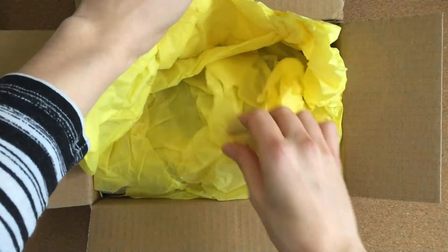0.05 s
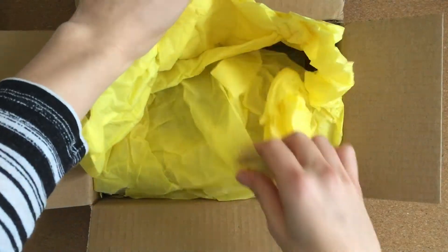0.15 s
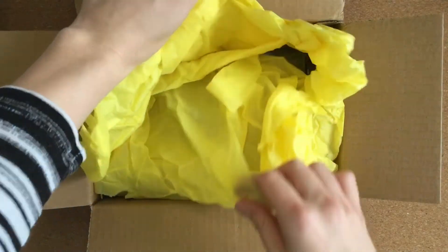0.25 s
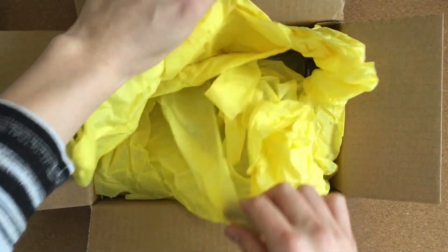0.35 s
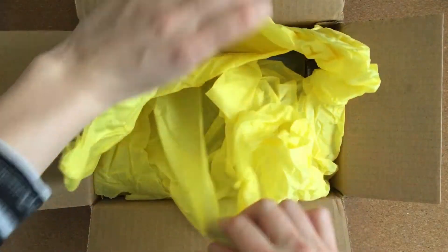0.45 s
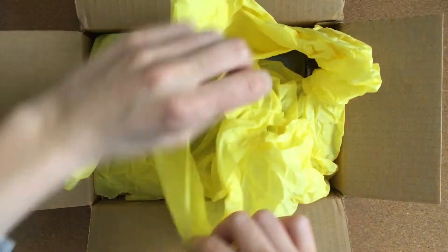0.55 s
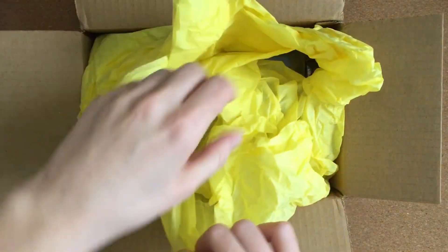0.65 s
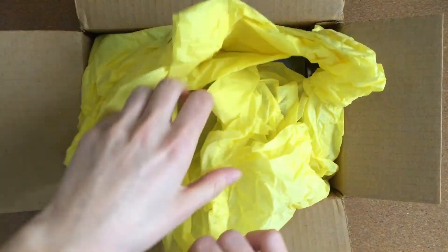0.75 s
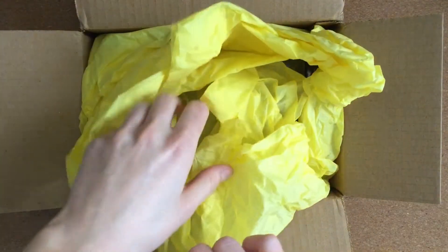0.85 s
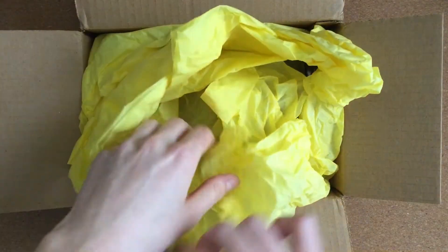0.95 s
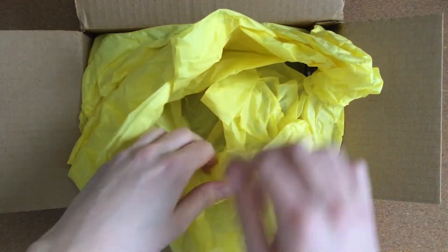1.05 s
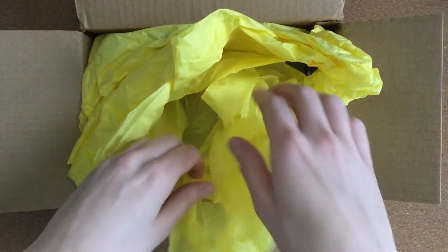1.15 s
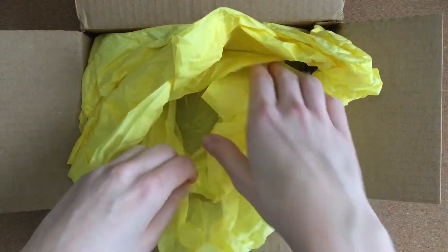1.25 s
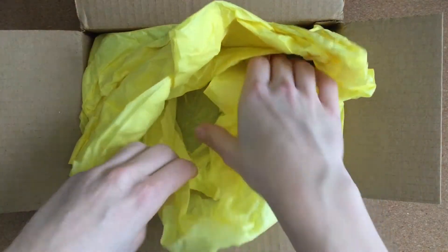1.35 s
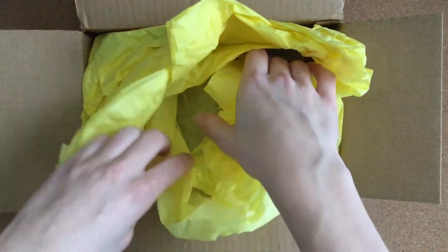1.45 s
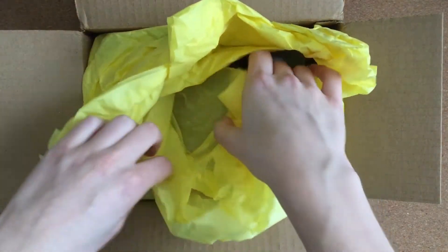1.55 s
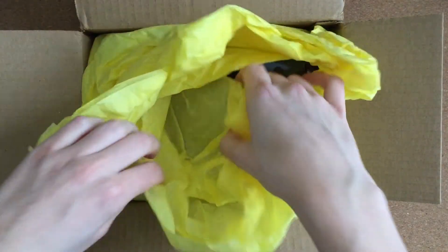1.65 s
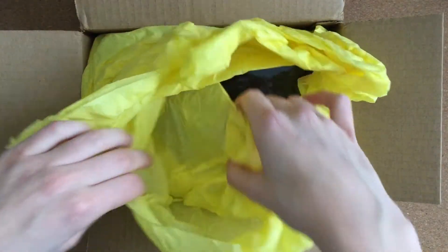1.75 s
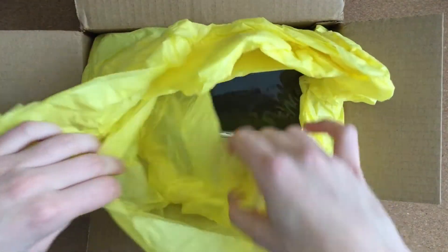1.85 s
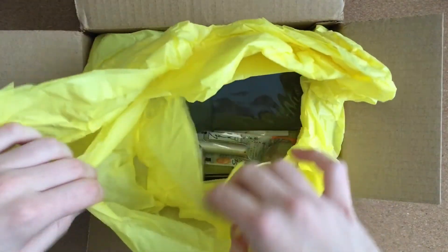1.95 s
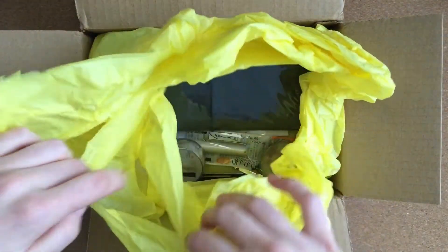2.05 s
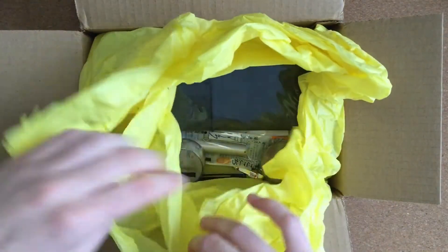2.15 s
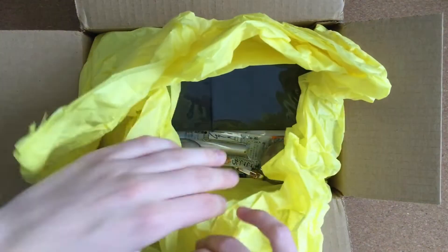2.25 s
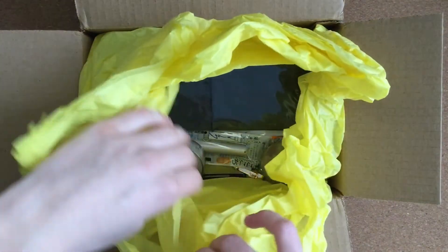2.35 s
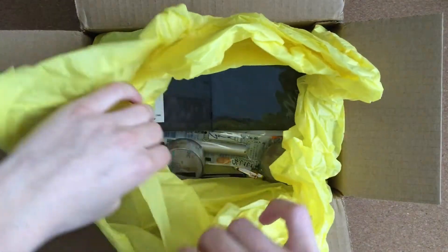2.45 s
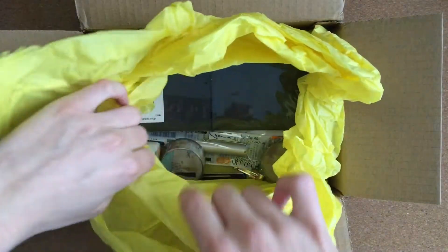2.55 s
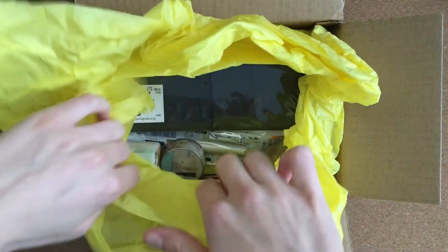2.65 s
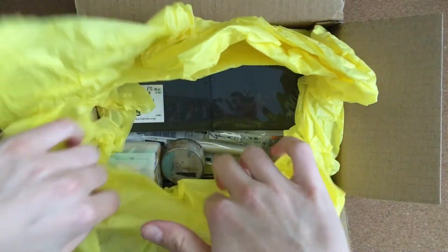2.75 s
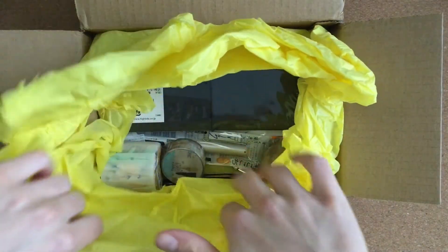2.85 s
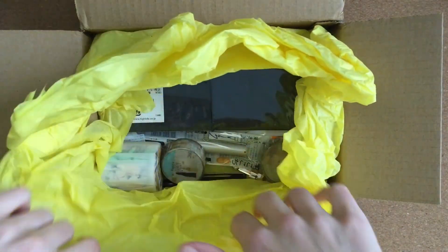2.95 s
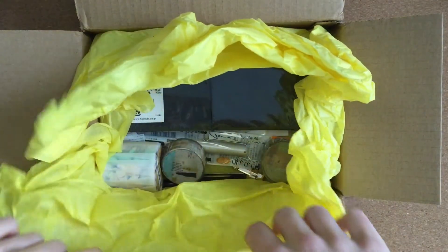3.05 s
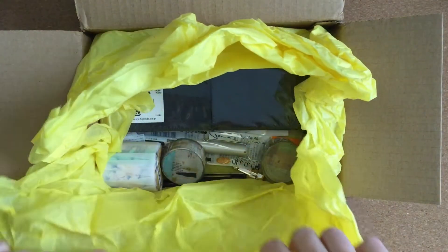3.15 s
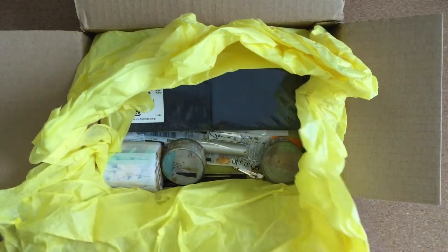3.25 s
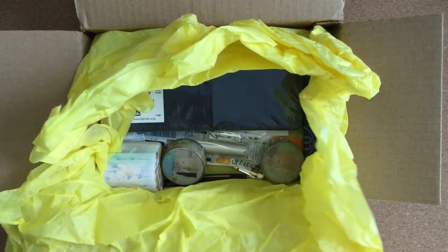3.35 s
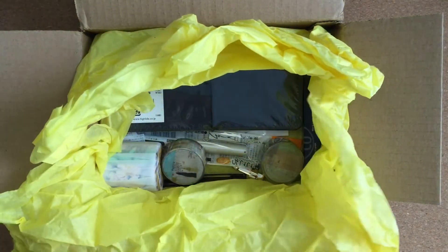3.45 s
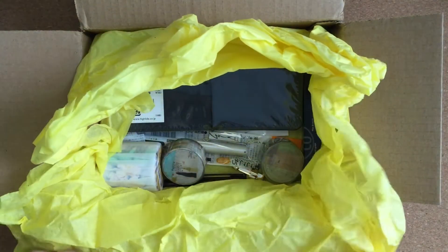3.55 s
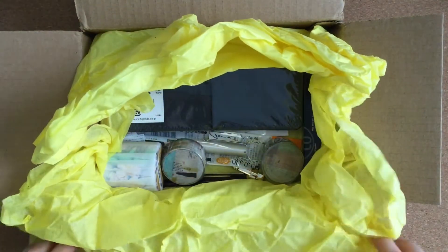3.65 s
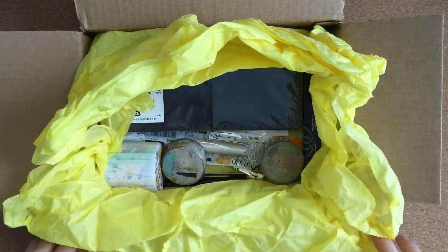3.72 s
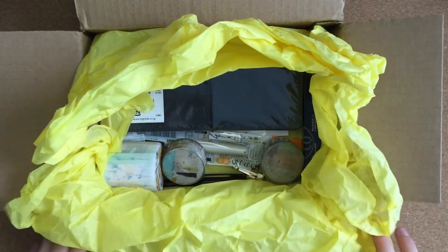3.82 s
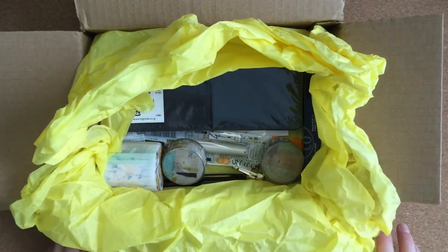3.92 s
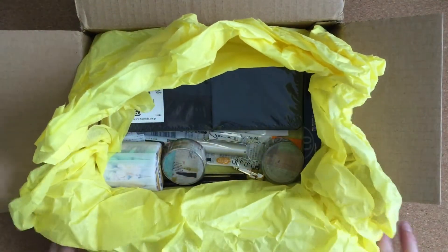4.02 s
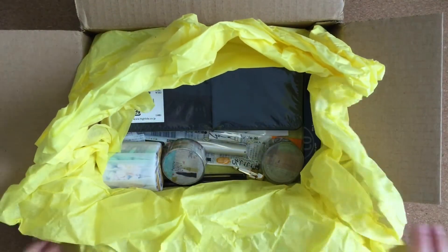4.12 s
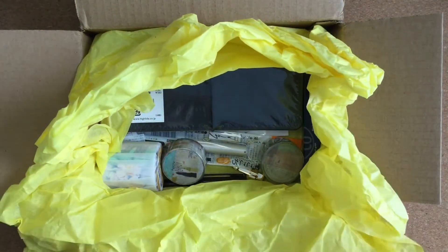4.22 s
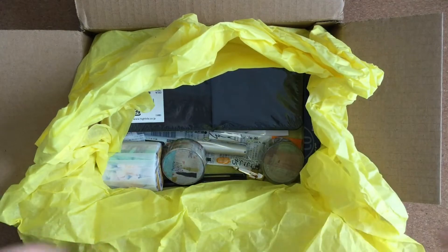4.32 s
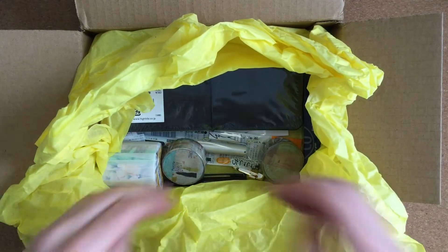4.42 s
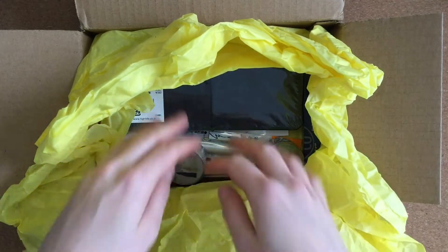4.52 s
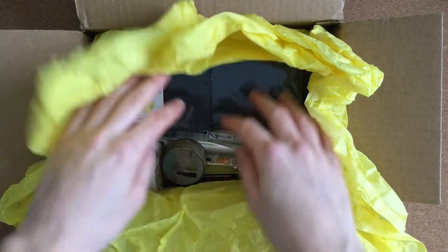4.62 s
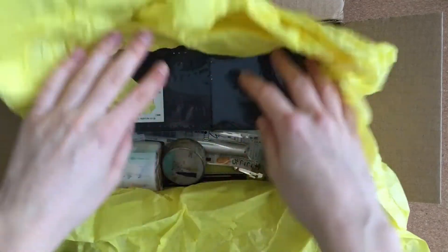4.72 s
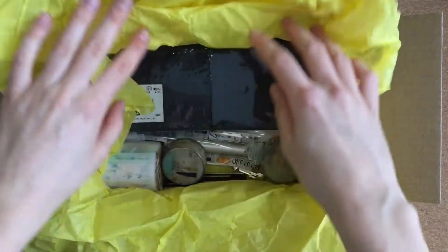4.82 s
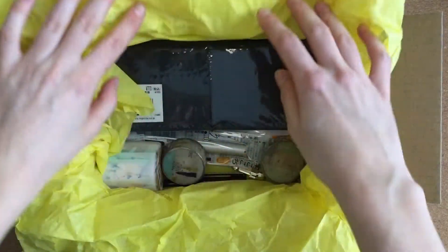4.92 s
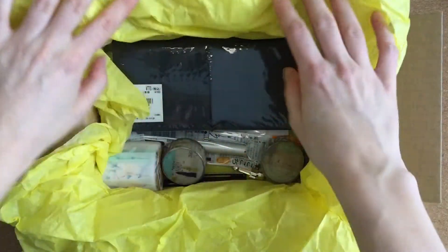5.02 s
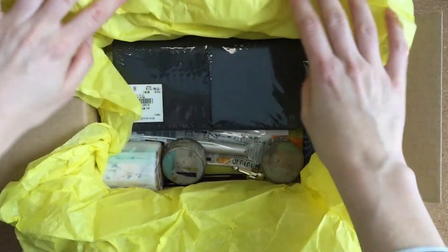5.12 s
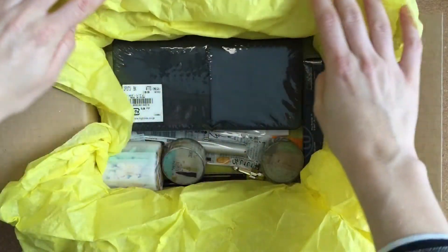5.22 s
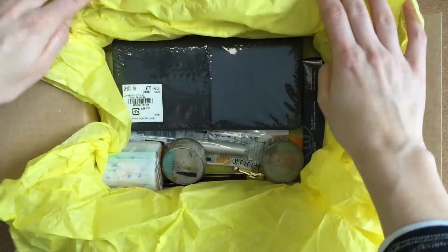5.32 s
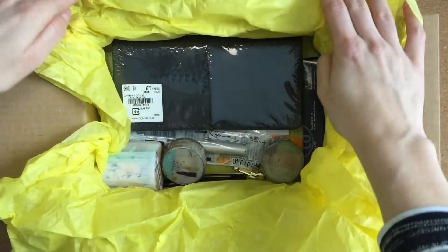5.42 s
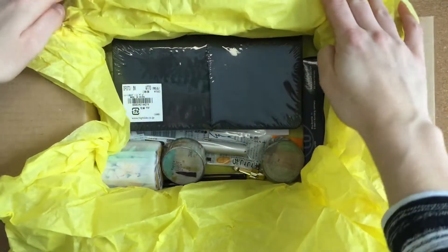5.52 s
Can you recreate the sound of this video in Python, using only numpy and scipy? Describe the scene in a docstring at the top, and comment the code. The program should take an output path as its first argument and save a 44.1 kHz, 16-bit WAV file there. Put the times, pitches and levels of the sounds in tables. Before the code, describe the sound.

Hands unfold crumpled tissue paper inside a cardboard box, making dense, crisp crinkling over a papery hiss, stroke after stroke, with a few sharper snaps. Midway, the paper is smoothed over a flap with a faint hollow rub and light finger taps. It settles briefly into small ticks, then rustles again as it is pushed back. The sound is close, in a quiet room.

```python
"""Unfolding tissue paper

Two hands unfold crumpled tissue paper in a cardboard box on a desk, in a quiet room. Creases buckle in
dense avalanches over the friction hiss of sheet on sheet, with a few louder snaps. The sheet flutters,
fingers tap the front flap and hands bump the box. Smoothing the paper over the flap excites a hollow
resonance; the paper settles with single ticks, then is pushed back."""
import sys
import numpy as np
from scipy import signal
from scipy.fft import rfft, irfft, next_fast_len
from scipy.io import wavfile
from scipy.ndimage import uniform_filter1d

SR = 44100
rng = np.random.default_rng(int(sys.argv[2]) if len(sys.argv) > 2 else 0)


def materialize(psi):
    """Save the field psi as 16-bit PCM at rate SR to the path in sys.argv[1].

    A 1-D psi becomes a single channel; in a 2-D psi each row is a channel.
    """
    bounded = np.clip(np.atleast_2d(psi).T, -1, 1)
    quanta = np.round(bounded * 32767).astype(np.int16)
    wavfile.write(sys.argv[1], SR, quanta)


N = 245825
TIME = np.arange(N) / SR
HZ = np.fft.rfftfreq(8192, 1 / SR)
RUB_START_S, RUB_RISE_S, RUB_HOLD_S, RUB_RELEASE_S = 2.94, 0.7, 0.22, 0.56  # paper drawn over the flap


def amp(db):
    """Amplitude ratio of a level in decibels."""
    return 10 ** (np.asarray(db) / 20)


def unit(x):
    """Normalisation to rms 1."""
    return x / np.sqrt(np.mean(x ** 2) + 1e-20)


def colour(points):
    """Magnitude response through (f/Hz, level/dB) points, interpolated in log frequency."""
    hz, db = np.transpose(points)
    return amp(np.interp(np.log(HZ + 1), np.log(hz), db))


def shaped(x, gain):
    """Minimum-phase filtering: the response is causal, so attacks stay sharp."""
    cepstrum = irfft(np.log(np.maximum(gain, 1e-5)))
    half = len(cepstrum) // 2
    cepstrum[1:half] *= 2
    cepstrum[half:] = 0
    response = irfft(np.exp(rfft(cepstrum)))
    return signal.oaconvolve(x, response)[:N]


def wander(hz, size=2048):
    """Random modulation: noise of rms 1 that rolls off above about hz."""
    f = np.fft.rfftfreq(size, TIME[-1] / size)
    drift = irfft(rfft(rng.standard_normal(size)) * f / (f + 6) / (1 + (f / hz) ** 2))
    return unit(np.interp(TIME, np.linspace(0, TIME[-1], size), drift))


def swell(start_s, rise_s, hold_s, release_s):
    """Trapezoidal envelope, 0-1: a movement gathers speed, holds it and slows to a stop."""
    since = TIME - start_s
    return np.clip(np.minimum(since / rise_s, 1 - (since - rise_s - hold_s) / release_s), 0, 1)


def room_air():
    """Ambient noise: the still room has a steady spectrum, strongest in the bass."""
    # spectrum of still air: f/Hz, relative level/dB
    spectrum = [(18, -21), (35, 5), (116, 2.5), (240, -13), (472, -4), (2300, -43), (5000, -60),
                (15000, -25)]
    return amp(-83.5) * unit(shaped(rng.standard_normal(N), colour(spectrum)))


def handling():
    """Incoherent addition: hand strokes sum in power and set the timbre by their share of it."""
    # strokes: start t/s, rise/s, hold/s, release/s, crease level/dB,
    # relative fold level/dB, relative crinkle level/dB, facet f/Hz, tautness (0-1)
    strokes = [(-0.25, 0.43, .22, .12, -47.5, -12.5, -1.5, 1790, 0.24),
               (0.372, 0.085, 0.06, 0.1, -50, -13, -3, 1680, 0.17),
               (0.518, 0.047, 0.069, 0.19, -49.5, -12.5, -3.5, 1850, 0.34),
               (0.718, 0.1, .02, 0.14, -52, -10.5, -2, 1920, 0.17),
               (0.854, 0.065, .08, 0.21, -56.5, -14, 3, 2100, 0.1),
               (1.071, 0.036, .02, 0.13, -57.5, -10.5, -0.5, 2150, 0),
               (1.173, 0.028, 0.018, 0.19, -57, -12.5, 2, 2010, .05),
               (1.313, 0.037, 0.24, 0.18, -54, -14, -2, 1180, 0.25),
               (1.491, .24, 0.025, .09, -48, -13, -2.5, 1900, 0.03),
               (1.755, 0.067, 0.22, 0.057, -47.5, -11.5, -.8, 1930, .14),
               (2.01, 0.12, 0.0057, 0.099, -49.5, -10, -2, 1770, 0),
               (2.152, 0.053, 0.072, 0.16, -56, -13, -2, 3900, 0),
               (2.321, 0.17, 0.12, 0.062, -51, -14, -0.5, 1890, 0.1),
               (2.584, 0.087, 0.23, 0.28, -48.5, -16, -1.5, 3950, 0.19),
               (2.993, 0.088, .17, 0.15, -54, -11, 1.5, 3396, .08),
               (3.28, 0.036, 0.2, 0.17, -51, -11.5, 1, 3300, 0),
               (3.532, 0.076, 0.1, 0.037, -51, -11.5, 3, 1290, .03),
               (3.67, 0.089, 0.21, 0.086, -50, -12.5, 0, 1280, 0.08),
               (3.993, 0.064, 0.12, 0.11, -56, -15.5, 0, 2400, .05),
               (4.143, 0.068, 0.069, 0.12, -61, -17.5, -.5, 2400, .1),
               (4.599, 0.04, 0.015, .07, -59, -9, -2, 1700, .03),
               (4.66, 0.082, 0.058, 0.11, -50, -11, 0.5, 1540, 0),
               (4.829, 0.081, 0.0063, 0.14, -51, -9, 1.5, 2300, 0),
               (4.944, 0.085, 0.057, 0.16, -51.5, -12.5, -0.5, 2500, 0.03),
               (5.093, 0.15, 0.063, 0.11, -49, -11.5, 0, 2520, .28),
               (5.328, 0.044, 0.16, 0.2, -52.5, -7.5, 0, 2230, 0)]
    power = np.array([(amp(db) * swell(start, rise, hold, release)) ** 2
                      for start, rise, hold, release, db, *_ in strokes])
    power += amp(-87) ** 2 / len(strokes)  # left alone, the creases still creep faintly
    total = power.sum(0)
    timbre = np.array(strokes)[:, 5:].T @ power / total
    return 10 * np.log10(total), *timbre


def buckle_sizes(per_s, spread_db):
    """Poisson process: most buckles are small, a few large; mean power is independent of the rate."""
    sizes = amp(spread_db * np.minimum(rng.exponential(1, N), 3.3)) * np.sign(rng.random(N) - .5)
    occurs = rng.random(N) < per_s / SR
    return sizes * occurs / np.sqrt(per_s)


def cracks(per_s, spread_db, decay_s):
    """Impulsive excitation: each buckle releases a burst of fibre noise that decays exponentially."""
    power = signal.lfilter([1], [1, -np.exp(-2 / (decay_s * SR))], buckle_sizes(per_s, spread_db) ** 2)
    return unit(np.sqrt(power) * rng.standard_normal(N))


def crackle(per_s, spread_db, cycles, size=640):
    """Damped free vibration: stiff facets ring for a few cycles, each at its natural frequency."""
    sizes = buckle_sizes(per_s, spread_db)
    onsets = np.flatnonzero(sizes)[:, None]
    hz = 900 * (14000 / 900) ** rng.random(N)[onsets]
    t = TIME[:size]
    strength = sizes[onsets] * hz  # higher rings are stronger, so the crackle is evenly bright
    rings = strength * np.sin(2 * np.pi * hz * t) * np.exp(-t * hz / cycles)
    samples = onsets + np.arange(size)
    return unit(np.bincount(samples.ravel(), rings.ravel(), N)[:N])


def box_echoes(x, spots=8, walls_t60_s=0.15, room_t60_s=0.18):
    """Reflection: each spot on the sheet has its own quick wall echoes and faint room tail."""
    t = TIME[:SR // 4]
    spot = rng.integers(0, spots, N // 128 + 1).repeat(128)[:N]
    out = x.copy()
    for k in range(spots):
        walls = rng.standard_normal(len(t)) * amp(-60 * t / walls_t60_s) * (t > .001)
        tail = rng.standard_normal(len(t)) * amp(-60 * t / room_t60_s) * (t > .005)
        response = amp(-5.5) * walls / np.linalg.norm(walls) + amp(-17.5) * tail / np.linalg.norm(tail)
        share = uniform_filter1d(1. * (spot == k), size=32)
        out += signal.oaconvolve(x * share, response)[:N]
    return out


def resonate(x, hz, width_hz):
    """Resonance: a single mode of unit gain whose centre frequency may glide."""
    turn = np.exp(2j * np.pi * np.cumsum(hz * np.ones(len(x))) / SR)
    pole = np.exp(-np.pi * width_hz / SR)
    return 2 * (turn * signal.lfilter([1 - pole], [1, -pole], x / turn)).real


def rustle(level_db, folds_db, fine_db, facet_hz, tautness):
    """Buckling avalanches over friction hiss: faster handling flips more creases, in clumps."""
    # tone colour of the rustle as heard on the desk: f/Hz, relative level/dB
    tone = [(60, -34), (150, -25.5), (250, -8.5), (330, -7.5), (420, -6.5), (560, -7), (670, -2), (900, -4),
            (1150, -3.5), (1700, -4), (2700, -4), (3900, -4.5), (5800, -5), (9000, -6.5), (13000, -9.5),
            (15500, -11)]
    # notches of the microphone port: f/Hz, width/Hz, level/dB
    notches = [(4900, 170, -6), (7630, 770, -3), (10390, 620, -6)]
    activity = np.clip(amp(.8 * (level_db + 50)), 0.11, 2)  # buckling rate relative to a usual stroke
    soft = cracks(2100 * activity, spread_db=3.0, decay_s=0.0015)
    stiff = crackle(1900 * activity, spread_db=0.5, cycles=5.7)
    taut = crackle(380 * activity, spread_db=1.0, cycles=9.7)
    buckles = (soft + amp(-3.5) * stiff + amp(-8.0) * taut) * amp(0.99 * wander(hz=50.3))
    hiss = amp(-2.5) * rng.standard_normal(N)
    port_db = sum(db / (1 + (2 * (HZ - centre) / width) ** 2) for centre, width, db in notches)
    sheet = shaped(box_echoes(buckles + hiss), colour(tone) * amp(port_db))
    # broad folds sound low, creases in the middle, fine crinkles high
    size = next_fast_len(N, True)
    f, spectrum = np.fft.rfftfreq(size, 1 / SR), rfft(sheet, size)
    low = 1 / (1 + (f / 900) ** 4)
    high = 1 - 1 / (1 + (f / 4600) ** 4)
    folds, creases, crinkles = (unit(irfft(spectrum * band)[:N]) for band in (low, 1 - low - high, high))
    tautness = np.clip(tautness, 0, 1)  # taut paper favours one pitch
    creases = (1 - tautness) * creases + tautness * unit(resonate(creases, facet_hz, width_hz=920))
    brisk_db = 0.13 * (level_db + 50.5)  # broad folds need brisk movement
    return amp(level_db) * (creases + amp(folds_db + brisk_db) * folds + amp(fine_db) * crinkles)


def billow(folds_db):
    """Air displacement: the sheet flutters with its folds, puffs as it flops and rumbles on the flap."""
    # spectrum of the flutter: f/Hz, relative level/dB
    spectrum = [(20, -42), (32, 0), (42, 5.5), (58, 6.5), (125, 13), (190, 12.5), (300, -4), (700, -53)]
    # the whole sheet flops and pushes air: centre t/s, duration/s, level/dB
    puffs = [(0.457, 0.066, -66.5), (0.777, 0.11, -80), (1.833, .12, -67), (2.142, 0.043, -66),
             (2.606, .1, -73), (2.863, 0.41, -69), (3.59, .17, -68), (4.908, 0.048, -65), (5.06, .08, -71),
             (5.178, 0.052, -68), (5.31, .08, -73)]
    usual_flutter_db, usual_folds_db, rumble_db = -76, -61.5, -73.5
    power = amp(usual_flutter_db + .9 * (folds_db - usual_folds_db)) ** 2
    drag_speed = swell(RUB_START_S, RUB_RISE_S, RUB_HOLD_S, RUB_RELEASE_S)
    power += (amp(rumble_db) * drag_speed) ** 2  # the drag shakes the box
    for s, length_s, db in puffs:
        power += (amp(db) * np.exp(-(2 * (TIME - s) / length_s) ** 2)) ** 2
    flutter = unit(shaped(rng.standard_normal(N), colour(spectrum)))
    return np.sqrt(power) * flutter * amp(1.7 * wander(hz=7.1))


def add(mix, s, sound):
    """Superposition: a sound joins the mix at s seconds."""
    part = mix[max(round(s * SR), 0):][:len(sound)]
    part += sound[:len(part)]


def finger_taps(rise_s=0.0019):
    """Modal vibration: a soft fingertip excites the damped modes of the cardboard flap."""
    # finger contacts: t/s, peak level/dB
    taps = [(0.23, -45.5), (1.445, -48.5), (3.141, -43), (3.22, -47), (3.61, -47), (4.065, -43.5),
            (4.358, -57.5), (4.582, -60.5), (4.74, -43.5)]
    # modes of the flap: f/Hz, relative level/dB, T60/s
    modes = [(675, 4.5, 0.057), (770, 5.5, 0.054), (1144, 2.5, 0.035), (1860, -1, 0.065)]
    t = TIME[:SR // 8]
    ring = sum(amp(db - 60 * t / t60) * np.sin(2 * np.pi * hz * t) for hz, db, t60 in modes)
    knock = (1 - np.exp(-t / rise_s)) * ring
    out = np.zeros(N)
    for s, db in taps:
        add(out, s, amp(db) * knock / abs(knock).max())
    return out


def snaps(decay_s=0.0015, cycles=5.2, size=1000):
    """Snap-through buckling: single stiff creases flip with a crunch, a bright edge and a short ring."""
    # creases giving way: t/s, level/dB before filtering, ring f/Hz, relative edge level/dB
    creases = [(0.36, -21, 3810, 0.5), (0.39, -24, 1930, 5), (0.445, -23, 1840, -7),
               (0.571, -23.5, 2256, -4), (0.632, -25.5, 1820, -9), (0.8107, -22.5, 1900, 6),
               (0.883, -26, 5430, -3), (0.94, -31, 7000, -3), (1.62, -25, 1590, 9), (1.824, -27, 1700, -6),
               (1.945, -28, 2020, 1), (2.044, -25, 4270, 10), (3.059, -23, 2150, 11),
               (3.142, -26, 3670, 14), (3.317, -24.5, 2730, 13), (4.291, -37, 2720, 4),
               (4.357, -42, 1850, -10), (4.371, -52, 5630, -5), (4.3855, -46, 3580, 1),
               (4.405, -43.5, 2640, -8), (4.425, -50, 5500, 0), (4.451, -49, 3450, -8),
               (4.454, -40.5, 3900, 5), (4.516, -50.5, 3080, 8), (4.5606, -57, 3860, -8),
               (4.581, -48, 2700, -20), (4.613, -38.5, 4100, 3), (4.905, -29, 2350, -2),
               (5.5216, -31.5, 3420, -16)]
    t = TIME[:size]
    out = np.zeros(N)
    for s, db, hz, edge_db in creases:
        ring = np.sin(2 * np.pi * hz * t) * np.exp(-t * hz / cycles)
        crunch = unit(resonate(rng.standard_normal(size), hz, width_hz=0.43 * hz))
        edge = amp(edge_db) * rng.standard_normal(size)
        snap = 0.32 * ring + 0.25 * (crunch + edge) * np.exp(-t / decay_s)
        add(out, s, amp(db) * snap / np.hypot(1, amp(edge_db)))
    high_pass = HZ ** 2 / (HZ ** 2 + 1300 ** 2)
    return box_echoes(shaped(out, high_pass))


def hand_bumps(rise_s=0.0092):
    """Soft impact: a hand sets the box into a low, heavily damped oscillation."""
    # bumps on the box: t/s, envelope peak level/dB, f/Hz
    bumps = [(0.725, -68, 61.6), (0.809, -75, 88), (1.22, -65, 57.7), (2.37, -68, 52), (3.221, -67, 95),
             (3.659, -61.5, 75), (4.897, -67, 113)]
    t = TIME[:SR // 4]
    envelope = t / rise_s * np.exp(1 - t / rise_s)
    out = np.zeros(N)
    for s, db, hz in bumps:
        add(out, s, amp(db) * envelope * np.sin(2 * np.pi * hz * t))
    return out


def flap_rub(level_db=-57.5, first_hz=829, last_hz=650, glide_s=0.85):
    """Forced vibration: friction drives the flap's hollow resonance, which sinks as paper covers it."""
    speed = swell(RUB_START_S, RUB_RISE_S, RUB_HOLD_S, RUB_RELEASE_S)
    hz = np.interp(TIME, [RUB_START_S, RUB_START_S + glide_s], [first_hz, last_hz])
    friction = rng.standard_normal(N) * amp(2.0 * wander(hz=29.47))
    hum = resonate(resonate(friction, hz, width_hz=260), hz, width_hz=240)
    return amp(level_db) * speed * unit(hum)


def scene():
    """Linear superposition: the still room, paper and cardboard add at one microphone."""
    air = room_air()
    level_db, folds_db, fine_db, facet_hz, tautness = handling()
    paper = rustle(level_db, folds_db, fine_db, facet_hz, tautness) + snaps()
    cardboard = finger_taps() + hand_bumps() + flap_rub()
    return (air + paper + billow(level_db + folds_db) + cardboard)[None]


def record(dry, low_hz=38, high_hz=15900):
    """Band limiting: a high-pass removes the deepest bass and a steep low-pass the highest treble."""
    bass_cut = signal.butter(4, low_hz, "highpass", fs=SR, output="sos")
    treble_cut = signal.firwin(511, high_hz, window=("kaiser", 8), fs=SR)
    return signal.oaconvolve(signal.sosfilt(bass_cut, dry), treble_cut[None], "same")


dry = scene()
out = record(dry)
materialize(out)
```